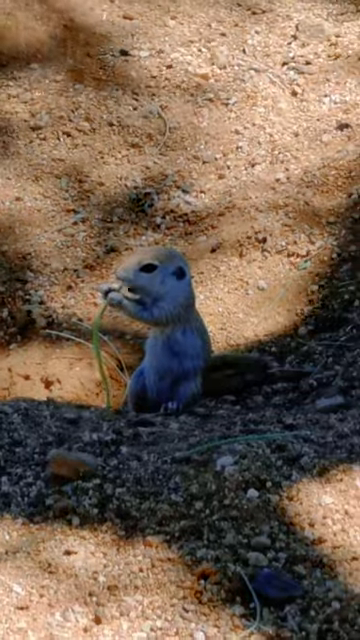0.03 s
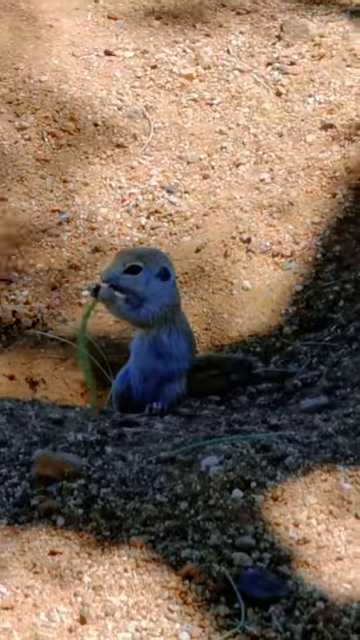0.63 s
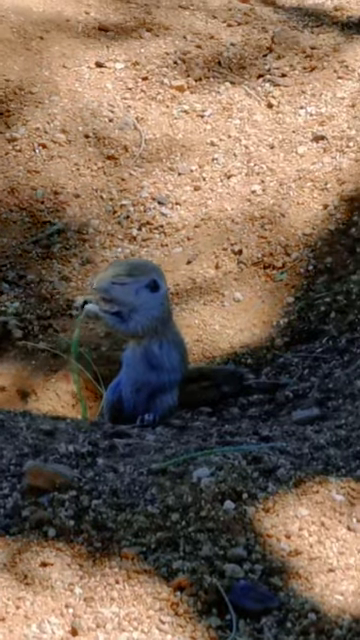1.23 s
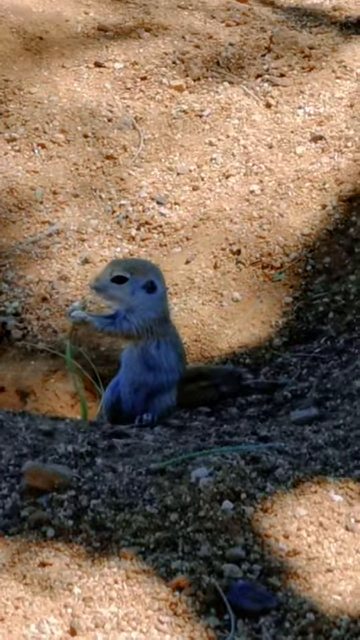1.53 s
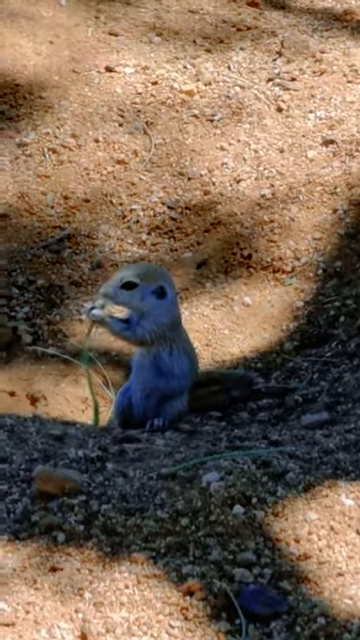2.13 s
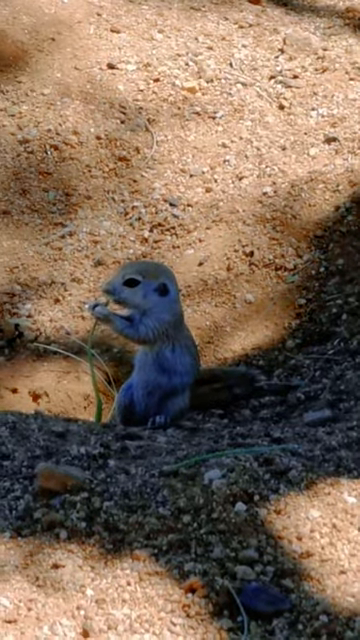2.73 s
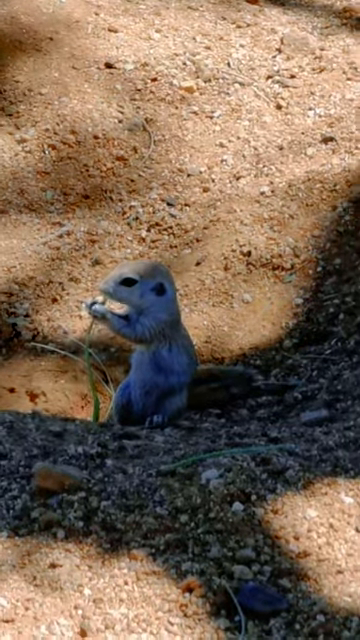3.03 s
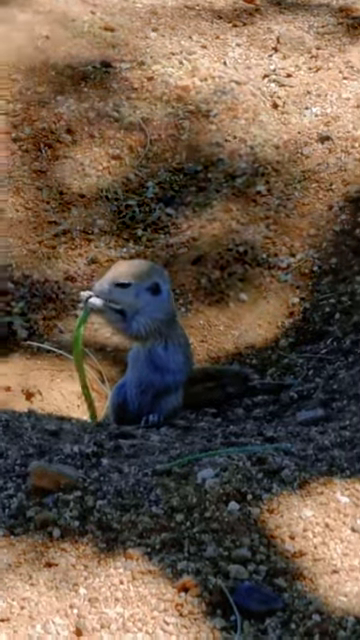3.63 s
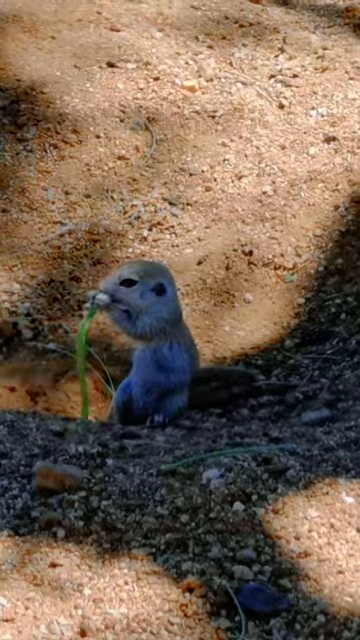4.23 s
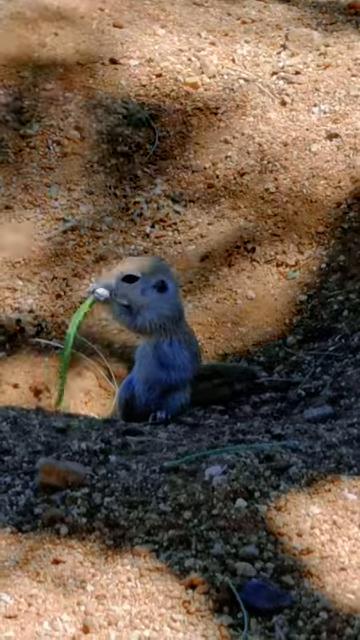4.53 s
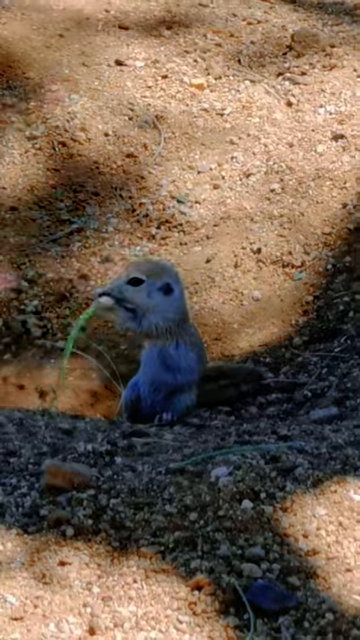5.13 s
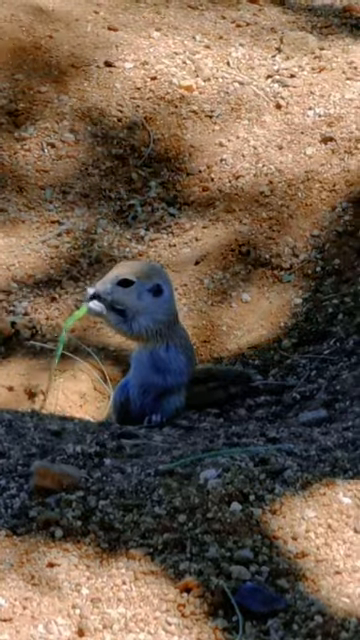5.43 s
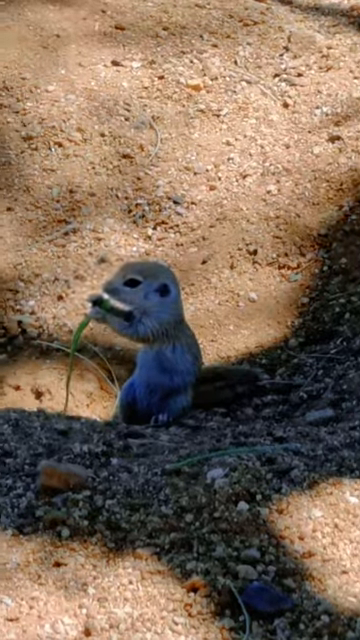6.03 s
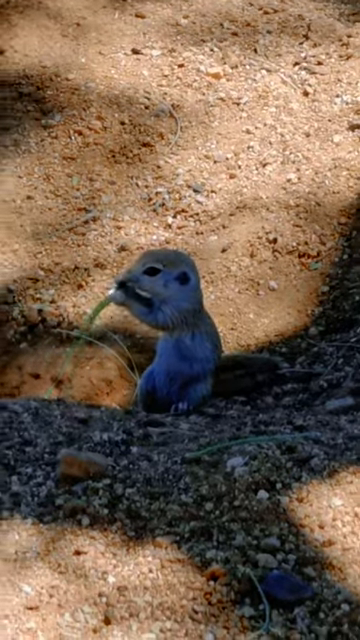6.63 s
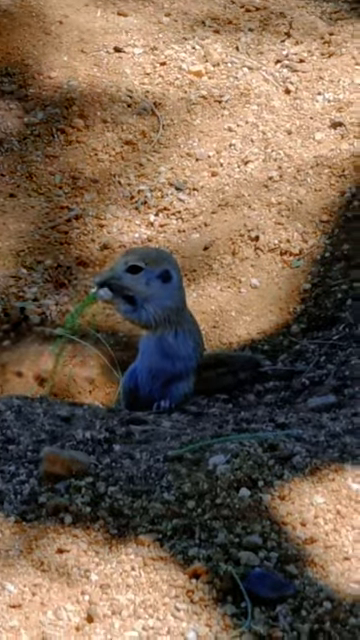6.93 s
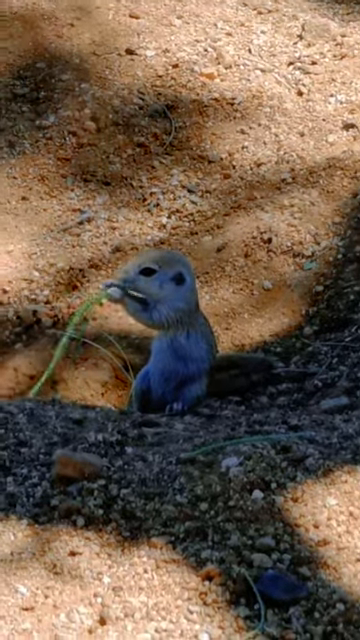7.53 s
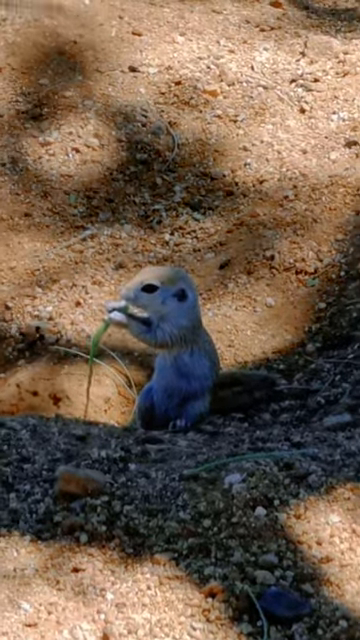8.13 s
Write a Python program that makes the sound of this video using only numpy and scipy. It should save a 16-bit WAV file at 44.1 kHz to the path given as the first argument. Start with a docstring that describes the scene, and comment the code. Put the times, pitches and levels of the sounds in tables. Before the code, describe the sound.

Small birds call outdoors over a soft, steady hush, one close and others farther away, their notes ringing on slightly. Thin high whistles and quick chirps begin in the first second. Louder high whistles come at about 1.4 to 1.8 seconds, then a lower rising whistle at 2 seconds, followed by mixed chips, slurs and short buzzes until about 3.3 seconds. From around 1.2 seconds, wind gusts buffet the microphone with low rumble and soft knocks, mostly on the left, strongest near 2 seconds and again from 5 to 7. Between 3.5 and 6.5 seconds only a few faint bird notes are heard. The near bird returns with a high falling whistle at 7 seconds, a quick run of sharp chips until 7.6, a loud raspy whistle at 8 and a last bright chirp. A very faint, distant tone wavers in the background throughout.

```python
"""Thin whistles, chips and buzzes of small birds, one near and others farther off, over an open-air hush.
Each note is a near sine from the syrinx, swept in pitch. Ground and trunks return discrete echoes,
and scattering in the foliage lets the notes ring on. Gusts buffet the microphone, mostly its left
port, where turbulent pressure is heard as rumble and knocks. A faint tone wavers in the background."""
import sys
import numpy as np
from scipy import signal
from scipy.fft import rfft, irfft, next_fast_len
from scipy.io import wavfile
from scipy.ndimage import uniform_filter1d, minimum_filter1d

SR = 44100
rng = np.random.default_rng(int(sys.argv[2]) if len(sys.argv) > 2 else 0)


def generate_wav(signal):
    """Clip the signal to [-1, 1] and save it as 16-bit WAV at the path in sys.argv[1]."""
    frames = np.transpose(np.atleast_2d(signal))
    scaled = np.clip(frames, -1, 1) * 32767
    pcm = np.round(scaled).astype(np.int16)
    wavfile.write(sys.argv[1], SR, pcm)


N = 369999


def gain_of(db):
    """The decibel scale: 20 dB is a tenfold amplitude."""
    return 10 ** (np.asarray(db) / 20)


def evened(x):
    """Normalisation to unit rms."""
    return x / np.sqrt(np.mean(x ** 2) + 1e-20)


def read(points, hz):
    """Interpolation of a table on a logarithmic frequency axis."""
    f, value = np.transpose(points)
    return np.interp(np.log(hz + 1), np.log(f + 1), value)


def add(mix, s, sound):
    """Superposition: a sound joins the mix at s seconds."""
    part = mix[..., max(round(s * SR), 0):][..., :sound.shape[-1]]
    part += sound[..., :part.shape[-1]]


def wander(size, rate_hz):
    """Random modulation: low-passed Gaussian noise of unit rms."""
    padded = size + SR // 4
    hz = np.fft.rfftfreq(padded, 1 / SR)
    spectrum = rfft(rng.standard_normal(padded)) * np.exp(-(hz / rate_hz) ** 2)
    return evened(irfft(spectrum))[:size]


def colour(x, gain_at):
    """Linear filtering: the spectrum is multiplied by a frequency response."""
    size = next_fast_len(N)
    return irfft(rfft(x, size) * gain_at(np.fft.rfftfreq(size, 1 / SR)), size)[..., :N]


def noise(spectrum):
    """Spectral shaping of white noise, brought to unit rms."""
    return evened(colour(rng.standard_normal(N), lambda hz: gain_of(read(spectrum, hz))))


def sine(hz):
    """Phase is the time integral of frequency."""
    return np.sin(2 * np.pi * np.cumsum(hz) / SR)


def hush(db=-35, swell_db=0.5):
    """Distant rumble and leaf hiss; left-right correlation sets how wide the hush sounds."""
    # ambient spectrum: f/Hz, relative level/dB
    spectrum = [(15, -12), (30, 0), (60, -6), (200, -11), (370, -18.5), (560, -19.5), (780, -22.5),
                (1050, -27.5), (1650, -33.5), (2170, -28.5), (3500, -34.5), (5000, -40), (8300, -43.5),
                (11500, -49), (15000, -57.5)]
    # stereo balance: f/Hz, left minus right level/dB
    balance = [(60, 10), (200, -2), (380, -3.5), (700, -6.5), (1300, -4), (2400, -5), (4400, 1.5),
               (7000, -1)]
    # stereo width, wide in the middle range and nearly centred in the treble: f/Hz, correlation
    correlation = [(60, 0.62), (290, 1), (640, 0.34), (1400, 0.47), (3000, 0.57), (7000, 1), (12000, 0.81)]
    left, independent = noise(spectrum), noise(spectrum)
    common = lambda hz: np.clip(read(correlation, hz), -1, 1)
    right = colour(left, common) + colour(independent, lambda hz: np.sqrt(1 - common(hz) ** 2))
    pair = colour(np.array([left, right]), lambda hz: gain_of(np.outer([.5, -.5], read(balance, hz))))
    return pair * gain_of(db + swell_db * wander(N, 0.83))


def drone(hz=565, waver_hz=22, db=-57, swell_db=4):
    """Slow frequency and amplitude modulation make a faint, far-off tone waver."""
    pitch = hz + waver_hz * wander(N, 9.43)
    return gain_of(db + swell_db * wander(N, 2.4)) * sine(pitch)


def breeze(rise_s=0.14, fall_s=0.11, calm_db=-40, unrest_db=1.7):
    """Unsteady flow: the rumble's level in dB rises with each gust, wavers and falls back."""
    # gusts at the windward port: start t/s, duration/s, relative level/dB
    gusts = [ (0.932, 0.16, -26), (1.245, 0.57, -15.5), (1.967, 0.46, -17), (2.597, .25, -17),
             (3.11, 0.44, -29), (3.453, 0.44, -19.5), (4.17, 0.079, -22.5), (4.553, 0.063, -22.5),
             (4.72, 0.35, -19), (5.28, .27, -17.5), (5.771, 0.3, -18), (6.188, 0.485, -16),
             (6.702, 0.34, -20), (7.12, 0.36, -27), (7.492, 0.35, -22), (8.152, 0.28, -15.5), ]
    t = np.arange(N) / SR
    levels_db = [np.interp(t, [s - rise_s, s, s + length, s + length + fall_s],
                           [calm_db, db, db, calm_db]) for s, length, db in gusts]
    return np.max(levels_db, axis=0) + unrest_db * wander(N, 9.7)


def wind(trim_db=1.0, lee_db=-37, lump_db=3.0, eddy_hz=28, push_db=-2, knock_db=4):
    """Turbulent pressure: gusts shake the left port, the right lies in the lee; eddies strike both."""
    # strongest eddies: centre t/s, duration/s, left level/dB, right level/dB
    eddies = [ (1.333, 0.3, -17, -58), (1.49, 0.17, -22.5, -60), (1.686, 0.037, -20.5, -52),
              (1.78, 0.059, -17, -60), (1.981, 0.034, -18.5, -65), (2.059, 0.068, -11, -58),
              (2.157, 0.14, -21, -57), (2.346, 0.16, -21, -60), (2.821, 0.046, -21.5, -60),
              (3.752, 0.058, -44, -22.5), (4.922, 0.34, -29, -24.5), (5.328, 0.16, -24, -61),
              (5.535, 0.13, -20.5, -48), (5.796, .05, -24.5, -60), (5.932, 0.063, -19.5, -40),
              (6, 0.13, -21.5, -24.5), (6.199, 0.041, -22.5, -65), (6.363, 0.073, -22.5, -58),
              (6.588, 0.18, -19.5, -58), (6.915, 0.041, -26.5, -60), (6.98, 0.19, -41, -28),
              (8.369, 0.14, -21.5, -29), ]
    # spectrum of the flow's rumble: f/Hz, relative level/dB
    rumble_spectrum = [(12, -9), (25, -0.5), (38, 4), (70, 3.5), (120, -0.5), (180, -8.5), (260, -16.5),
                       (500, -77.5)]
    # spectrum of an eddy's impact: f/Hz, relative level/dB
    buffet_spectrum = [(60, -11), (150, 7.5), (240, 3), (340, -4.5), (500, -26.5), (800, -51), (1500, -56),
                       (4000, -82)]
    # spectrum added by the hardest eddies: f/Hz, relative level/dB
    knock_spectrum = [(200, 2), (400, 13), (750, -4), (1200, -16), (3000, -63)]
    strikes = np.zeros((2, N))
    for s, length, *levels_db in eddies:
        for port, db in zip(strikes, levels_db):
            add(port, s - length, gain_of(db) * np.hanning(int(2 * length * SR)) ** 2)
    ports = []
    for db, strike in zip([breeze() + trim_db, lee_db], strikes):
        lumps = evened(gain_of(lump_db * wander(N, eddy_hz)))
        rumble = np.maximum(gain_of(db), gain_of(push_db) * strike) * noise(rumble_spectrum)
        # faster air makes smaller, brighter eddies
        knock = gain_of(knock_db) * strike ** 2 * noise(knock_spectrum)
        buffet = strike * noise(buffet_spectrum)
        ports.append(lumps * (rumble + buffet + knock))
    return np.array(ports)


def foliage(x, build_s=0.0067, reflections_per_s=3000):
    """Reverberation by scattering: many weak reflections build up quickly; the treble dies first."""
    # decay among the trees: f/Hz, reverberation time T60/s
    decay_times = [(2500, 1.14), (4000, 1.04), (7000, 0.63), (14000, 0.62)]
    taps = rng.standard_normal(SR) * (rng.random(SR) < reflections_per_s / SR)
    hz, t, bands = signal.stft(taps, SR, nperseg=256)
    envelope = gain_of(-60 * t / read(decay_times, hz)[:, None]) * (1 - np.exp(-t / build_s))
    tail = signal.istft(bands * envelope, SR, nperseg=256)[1]
    return signal.fftconvolve(x, tail / np.linalg.norm(tail))[:N]


def echoes(x):
    """Specular reflection: the ground and nearest trunks return delayed, weaker copies."""
    # reflected paths: delay t/s, level/dB relative to the direct sound
    paths = [(.0035, -12), (.009, -7.5), (.017, -21), (.029, -17), (.047, -22.5), (.083, -30), (.125, -27)]
    out = np.zeros(N)
    for delay, db in paths:
        add(out, delay, gain_of(db) * x)
    return out


def near_and_far(sound, distance):
    """Linear crossfade between the near path (distance 0) and the far path (distance 1)."""
    return np.outer([1 - distance, distance], sound)


def whistle(hz, db, jitter, flutter_db, edge_s=0.0017):
    """Self-sustained oscillation of one side of the syrinx: a near sine with a slight tremble."""
    size = len(hz)
    pitch = uniform_filter1d(hz, size=130) * (1 + jitter * wander(size, 270))
    fade = signal.windows.tukey(size, 2 * edge_s * SR / size)
    return gain_of(db + flutter_db * wander(size, 160)) * fade * sine(pitch)


def overtones(x, octave_db, upper_db, grain_db=3, grain_hz=200, knee_db=-28):
    """Nonlinearity of the syrinx: faint, grainy harmonics grow with the effort."""
    analytic = lambda v: signal.hilbert(v, next_fast_len(N))[:N]
    whole = analytic(x)
    low = analytic(colour(x, lambda hz: hz < 5000))
    envelope = abs(whole) + gain_of(knee_db)
    # the nth power of an analytic signal is its nth harmonic
    octave = gain_of(octave_db) * whole ** 2 / envelope
    upper = gain_of(upper_db) * (low ** 3 / envelope ** 2 + .5 * low ** 4 / envelope ** 3)
    grain = gain_of(grain_db * wander(N, grain_hz)) * np.exp(.8j * wander(N, grain_hz))
    return x + ((octave + upper) * grain).real


def rasps(shake_hz=450, edge_share=0.36):
    """Fast, irregular frequency modulation spreads a whistle into the sidebands of a hoarse buzz."""
    # buzzes: t/s, duration/s, start f/Hz, end f/Hz, relative level/dB, rms deviation/Hz
    notes = [ (0.145, .057, 3060, 4000, -45, 150), (.28, .1, 7700, 7900, -42.5, 180),
             (0.584, 0.085, 7750, 7460, -29, 221), (1.287, 0.067, 7640, 8180, -40.5, 320),
             (1.291, 0.053, 4430, 4200, -43.5, 407), (1.384, 0.29, 4250, 4380, -44, 458),
             (2.069, 0.157, 3955, 3900, -34.5, 325), (2.198, .2, 3940, 4200, -38.5, 378),
             (2.62, 0.046, 6950, 5050, -31, 380), (2.758, .042, 4135, 4450, -25, 350),
             (2.816, .044, 4770, 4120, -25, 324), (2.954, 0.039, 6180, 4880, -24, 402),
             (3.89, .28, 4024, 3500, -41.5, 343), (4.222, 0.16, 8520, 8360, -47, 70),
             (4.413, 0.18, 8270, 8100, -44, 90), (4.548, 0.11, 5710, 5520, -41, 45.3),
             (4.663, 0.21, 5620, 5565, -38, 74), (7.93, 0.13, 7220, 6670, -21, 277), ]
    out = np.zeros(N)
    for s, length, start_hz, end_hz, db, swing_hz in notes:
        size = int(length * SR)
        pitch = np.linspace(start_hz, end_hz, size) + swing_hz * wander(size, shake_hz)
        level = gain_of(db + 2 * wander(size, 200)) * signal.windows.tukey(size, edge_share)
        add(out, s, level * sine(pitch))
    return out


def chips(arch_db=9.5):
    """Linear chirps: the pitch drops in one slightly rough stroke, loudest halfway down."""
    # downstrokes: t/s, duration/s, top f/Hz, bottom f/Hz, relative level/dB, distance (0-1)
    notes = [ (0.906, .014, 3960, 3280, -13.5, 0), (0.952, 0.0099, 3260, 2870, -19.5, 0),
             (1.004, 0.015, 3230, 2610, -25, 0), (1.504, 0.019, 3910, 2910, -35.5, 0.8),
             (1.673, 0.027, 3730, 2950, -46, .9), (1.735, 0.021, 3624, 2950, -43, .9),
             (1.818, 0.024, 3740, 3130, -36, 0.95), (2.616, .036, 8380, 5820, -21.5, 0.25),
             (2.653, 0.025, 5390, 5160, -26.5, 0.7), (2.671, 0.021, 4060, 2700, -25, 1),
             (2.788, .02, 7400, 6670, -37, .3), (2.943, 0.016, 7330, 6100, -21.5, 0.05),
             (2.95, 0.015, 3930, 3230, -25.5, .9), (2.972, 0.019, 5660, 5000, -27, 0),
             (2.99, 0.022, 3950, 2720, -27.5, 1), (7.197, 0.025, 4100, 3680, -16, 0),
             (7.277, 0.013, 4110, 3460, -16, .1), (7.314, 0.028, 3950, 3194, -11, 0),
             (7.389, .019, 4130, 3085, -15.5, 0.25), (7.43, .014, 4080, 3330, -13, 0.2),
             (7.494, 0.02, 4214, 3340, -17.5, 0.16), (7.559, 0.021, 4080, 3320, -17, .1),
             (7.927, .012, 8180, 7430, -20.5, 0.3), (8.336, 0.0077, 6200, 4740, -26, 0),
             (8.375, 0.0078, 6600, 4550, -20, 0), ]
    out = np.zeros((2, N))
    for s, length, top_hz, bottom_hz, db, distance in notes:
        u = np.linspace(-1, 1, int(length * SR))
        hz = np.linspace(top_hz, bottom_hz, len(u))
        note = whistle(hz, db - arch_db * u ** 2, jitter=0.009, flutter_db=3.5)
        add(out, s, near_and_far(note, distance))
    return out


def slurs_and_rings(arch_db=3):
    """Quadratic chirps: the pitch follows a parabola while the level arches and swells or fades."""
    # slurred whistles, and the lingering ring of a few notes: t/s, duration/s, start f/Hz,
    # middle f/Hz, end f/Hz, relative level/dB, swell from start to end/dB, distance (0-1)
    tones = [ (0.259, 0.095, 3700, 3790, 4130, -35.5, 6, 0.95),
             (0.319, 0.044, 7900, 7520, 7440, -33, -1, .1), (0.372, 0.071, 7880, 7830, 7560, -27, -10, 0),
             (0.449, 0.051, 4470, 4650, 5100, -37, -1, 1), (0.576, 0.054, 3100, 3190, 3275, -42.5, 16, 1),
             (0.624, .175, 3296, 3376, 3550, -37, -1, .9), (0.801, 0.069, 3500, 3384, 3330, -19, -2, 0),
             (0.815, 0.078, 3680, 3733, 3490, -19, 0, 0), (0.817, 0.048, 4230, 4220, 4080, -34.5, -4, 0),
             (0.925, .026, 2480, 2680, 3060, -35, 16, .1), (0.973, 0.038, 2566, 2660, 3250, -25, 18, 0.3),
             (1.012, 0.066, 2575, 2526, 2790, -28, -3, 0.3), (1.08, .2, 2570, 2530, 2675, -33, -10, 0),
             (1.097, 0.18, 2966, 3166, 3273, -40, 6, 0.3), (1.426, 0.037, 3960, 3340, 3840, -40, 0, 0.7),
             (1.582, 0.029, 3850, 3010, 3800, -42.5, 10, 0.8),
             (1.746, .026, 5930, 6860, 7300, -25.5, 17, .1), (1.769, .078, 7340, 7580, 7580, -18, -6, 0.03),
             (2.048, 0.089, 4150, 3947, 4190, -28.5, -12, 0.3),
             (2.133, 0.038, 3490, 3150, 2320, -27.5, -11, 0.8), (2.167, .11, 2350, 2440, 2266, -38, 5, 0.8),
             (2.24, 0.087, 4830, 5070, 5010, -42.5, 6, 0.6), (2.297, 0.2, 2283, 2297, 2190, -45.5, -1, 0.6),
             (2.484, 0.055, 3580, 4414, 3710, -31.5, 5, 1), (2.597, 0.029, 3260, 3720, 3410, -28.5, 7, 0.9),
             (2.802, 0.028, 5500, 5515, 5470, -26.5, 2, 1), (2.888, .044, 3370, 3490, 3790, -27.5, 8, .3),
             (3.068, 0.024, 4410, 4270, 4580, -21.5, -5, .8),
             (3.098, 0.057, 4640, 4367, 3970, -23, -3, 0.5), (3.163, .05, 3485, 3530, 3820, -28.5, 8, 0.56),
             (3.215, 0.066, 3403, 3400, 3517, -22.5, 1, 0.5), (3.22, 0.33, 4140, 4030, 3925, -42.5, -13, 1),
             (3.281, .29, 3460, 3610, 3660, -38.5, -20, 0.77), (4.808, 0.094, 3190, 3117, 3090, -38, -3, 1),
             (4.901, 0.131, 3090, 3124, 3140, -41.5, 6, 1), (6.25, 0.11, 1684, 1720, 1600, -56, -6, 0.8),
             (6.421, 0.36, 2073, 2115, 2126, -60, 11, .9), (6.542, .07, 7500, 7920, 8060, -45.5, 8, .1),
             (6.61, 0.087, 8300, 8180, 8050, -34, 3, 0.2), (6.703, 0.028, 7820, 7600, 7700, -29.5, -2, .1),
             (6.738, .11, 8460, 8070, 7930, -37, 10, 0), (7.221, 0.022, 3460, 3570, 3660, -19, -1, 0),
             (7.233, 0.022, 4120, 4143, 4160, -11.5, -3, 0.3),
             (7.332, 0.059, 3346, 3320, 3550, -18.5, -11, 0.3),
             (7.348, 0.035, 4000, 4040, 4020, -22, 13, .1), (7.444, 0.025, 3260, 3242, 3330, -16, -1, 0.52),
             (7.463, 0.026, 3890, 3680, 3700, -20, -2, 0.2), (7.587, .22, 3785, 3554, 3507, -27, -4, 0),
             (8.343, 0.02, 4700, 5300, 5170, -25, -3, 0), (8.382, 0.019, 4440, 4600, 4750, -7.5, 5, 0.2), ]
    out = np.zeros((2, N))
    for s, length, start_hz, middle_hz, end_hz, db, swell_db, distance in tones:
        u = np.linspace(-1, 1, int(length * SR))
        parabola = np.polyfit([-1, 0, 1], [start_hz, middle_hz, end_hz], 2)
        level_db = db + swell_db * u / 2 - arch_db * u ** 2
        tone = whistle(np.polyval(parabola, u), level_db, jitter=0.0044, flutter_db=3.0)
        add(out, s, near_and_far(tone, distance))
    return out


def calls():
    """Frequency and amplitude modulation along contours shape the near bird's long, loud whistles."""
    # high whistles, one contour a call: t/s, f/Hz, relative level/dB
    high_calls = [
        [(0.542, 8454, -41), (0.552, 8410, -29), (0.564, 7954, -36), (0.572, 7784, -24), (0.58, 8192, -27),
         (0.594, 7741, -18.5), (0.606, 7633, -31), (0.616, 7548, -25), (0.626, 7984, -22), (0.646, 7549, -23),
         (0.666, 8030, -26.5), (0.68, 7730, -17.5), (0.69, 7647, -29)],
        [(1.391, 7020, -26.5), (1.401, 7090, -16), (1.409, 7750, -12), (1.417, 7730, -19), (1.459, 7980, -16.5),
         (1.487, 7866, -16.5), (1.501, 8120, -23.5), (1.515, 7868, -17), (1.541, 7900, -14.5),
         (1.58, 7935, -27)],
        [(1.631, 7560, -23), (1.641, 7740, -18.5), (1.683, 7900, -11), (1.705, 8015, -13), (1.715, 7970, -24),
         (1.729, 8190, -17), (1.775, 8440, -13.5)],
        [(6.913, 8678, -39), (6.921, 8640, -20), (6.935, 8220, -18.5), (6.949, 8152, -26), (6.959, 8000, -18.5),
         (6.977, 7790, -16.5), (7.003, 7943, -17.5), (7.019, 7710, -12.5), (7.029, 7810, -23.5),
         (7.043, 7681, -13.5), (7.067, 7386, -22.5), (7.093, 7214, -17.5), (7.11, 7100, -27)],
        [(7.907, 7495, -26), (7.927, 7730, -21), (7.935, 7100, -12.5), (7.951, 6704, -12), (7.959, 6800, -9.5),
         (7.965, 6694, -10.5), (8.027, 6923, -11), (8.035, 6789, -8), (8.045, 6110, -11), (8.057, 6170, -14),
         (8.065, 6701, -12.5), (8.075, 6140, -17.5)],
    ]
    # contour of a lower, rising whistle: t/s, f/Hz, relative level/dB
    low_call = [(1.927, 2756, -24.5), (1.939, 3124, -18), (1.957, 3520, -13.5), (1.965, 3977, -14),
                (2.013, 3890, -11.5), (2.053, 4230, -16), (2.066, 4000, -22)]
    out = np.zeros((2, N))
    for contours, trim_db, distance in [(high_calls, 2.0, 0.03), ([low_call], 0.9, 0.11)]:
        for contour in contours:
            s, hz, db = np.transpose(contour)
            t = np.arange(s.min(), s.max(), 1 / SR)
            level_db = np.interp(t, s, db) + trim_db
            note = whistle(np.interp(t, s, hz), level_db, jitter=0.006, flutter_db=2.17)
            add(out, s.min(), near_and_far(note, distance))
    return out


def birds(near_db=-1.5, far_db=-1.0, near_wet_db=-15.0, far_wet_db=-4.0):
    """The direct-to-reverberant ratio falls with distance: far birds carry more of the trees' ring."""
    near, far = calls() + slurs_and_rings() + chips()
    near = overtones(near, octave_db=-29, upper_db=-39.5)
    far = overtones(far, octave_db=-26, upper_db=-24)
    far += overtones(rasps(), octave_db=-19, upper_db=-22)
    direct = gain_of(near_db) * near + gain_of(far_db) * far
    scattered = foliage(gain_of(near_wet_db) * near + gain_of(far_wet_db) * far)
    return direct + echoes(direct) + scattered


def scene():
    """Superposition: birds and drone sit in the centre; wind and hush are wide."""
    return birds() + wind() + hush() + drone()


def record(dry, ceiling=0.95, limiter_samples=400, edge_hz=15500):
    """Port resonance colours the sound; a quick limiter common to both ports and a low-pass follow."""
    # notch and resonance of the microphone's ports: f/Hz, gain/dB
    response = [(10000, 0.5), (11200, 1), (12400, -8.5), (13300, 4.5), (14300, 9), (15500, 1.5)]
    heard = colour(dry, lambda hz: gain_of(read(response, hz)))
    peak = np.maximum(abs(heard).max(axis=0), ceiling)
    allowed_gain = minimum_filter1d(ceiling / peak, size=limiter_samples)
    limited = heard * uniform_filter1d(allowed_gain, size=limiter_samples)
    lowpass = signal.firwin(511, edge_hz, window=("kaiser", 9), fs=SR)
    return signal.oaconvolve(limited, lowpass[None], "same")


dry = scene()
out = record(dry)
generate_wav(out)
```